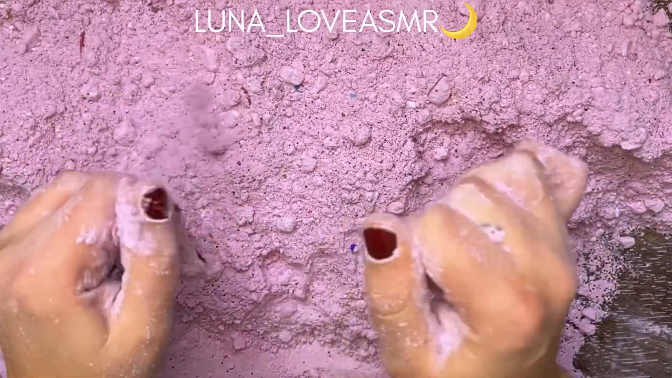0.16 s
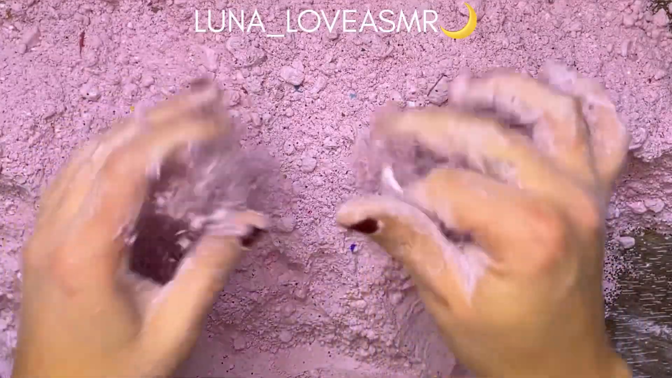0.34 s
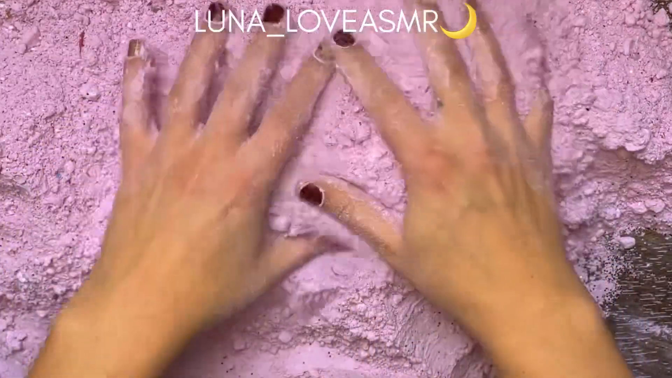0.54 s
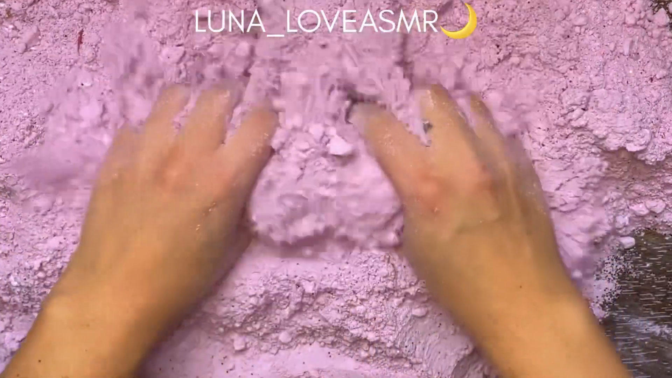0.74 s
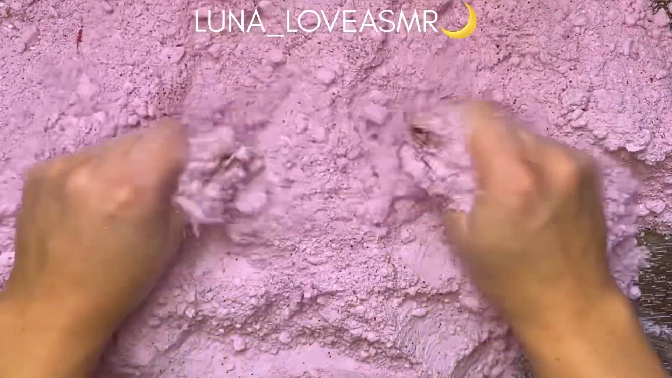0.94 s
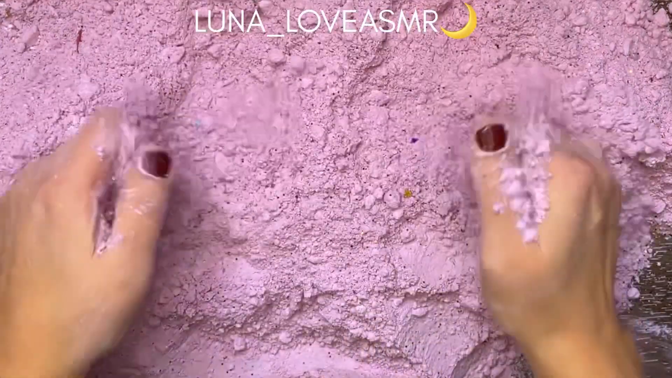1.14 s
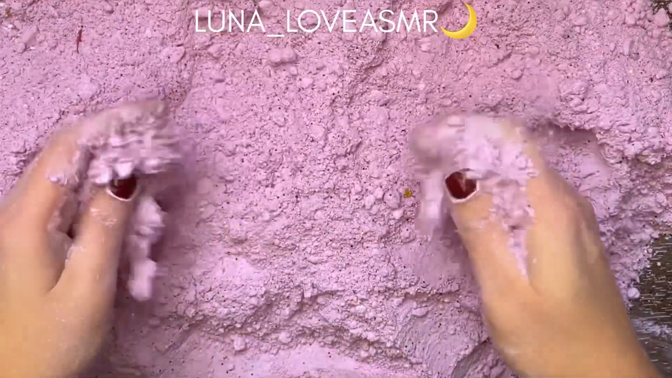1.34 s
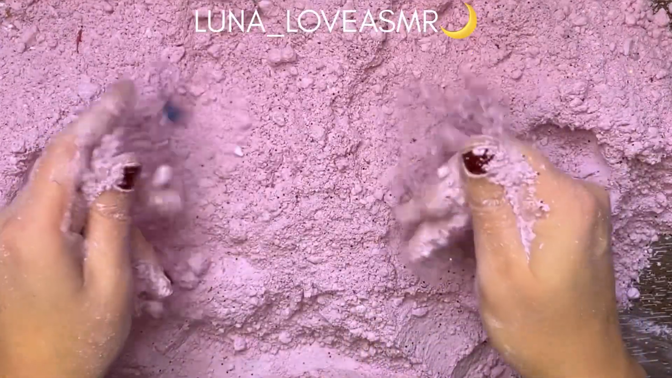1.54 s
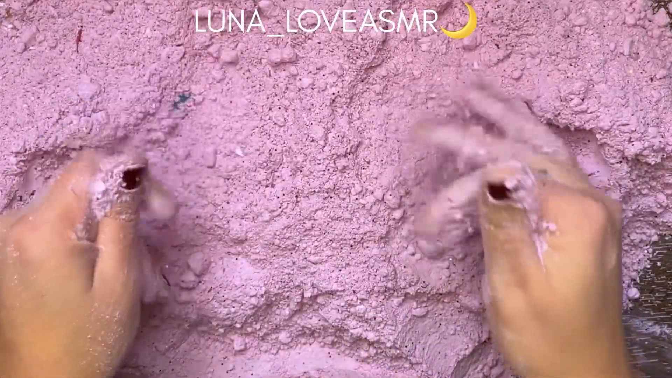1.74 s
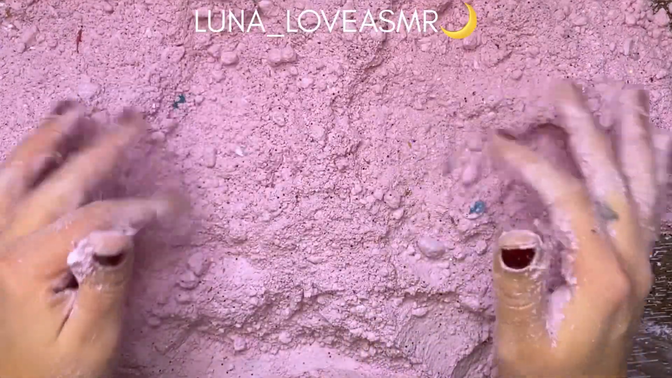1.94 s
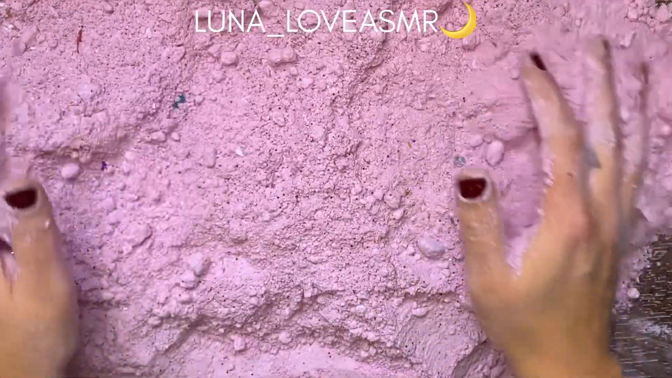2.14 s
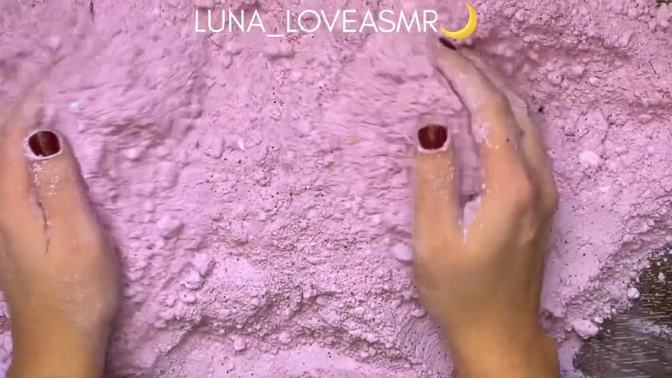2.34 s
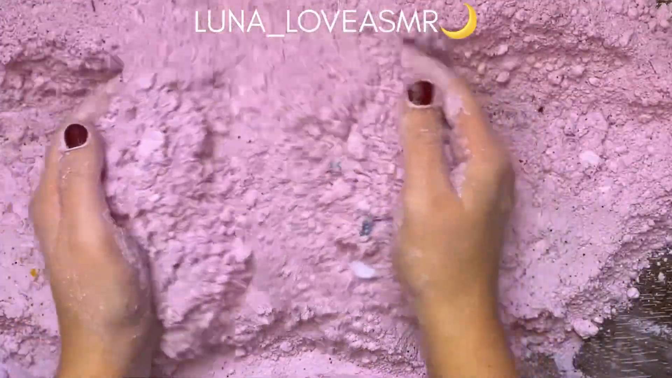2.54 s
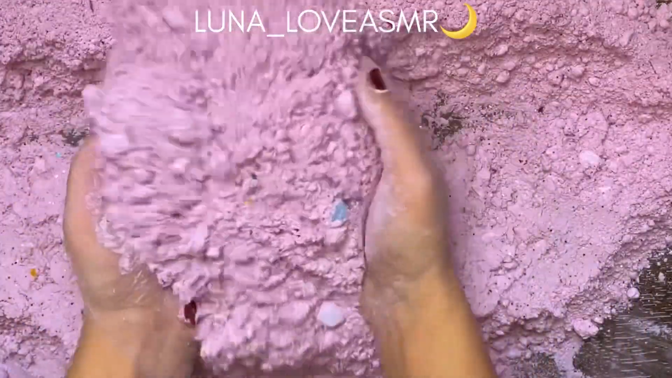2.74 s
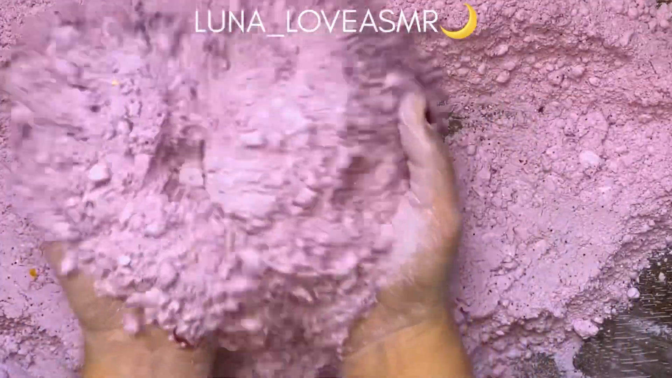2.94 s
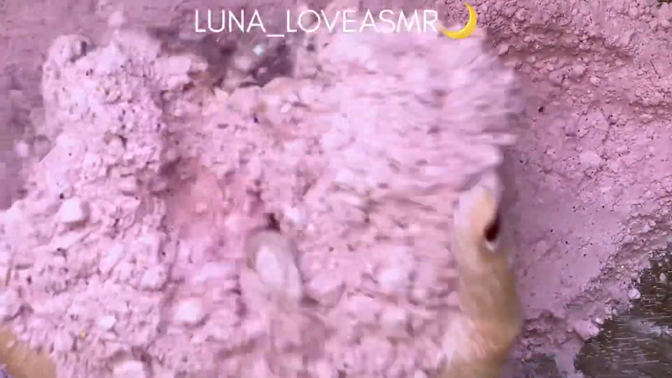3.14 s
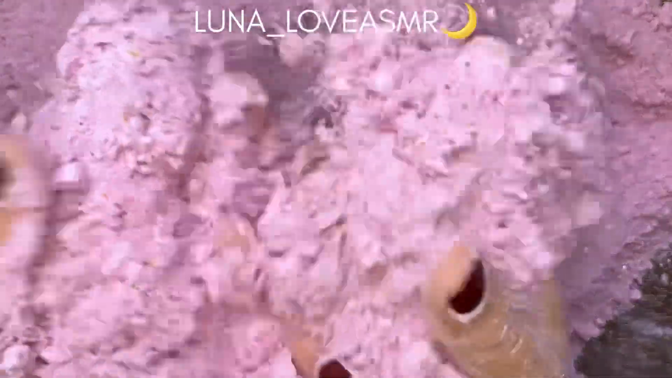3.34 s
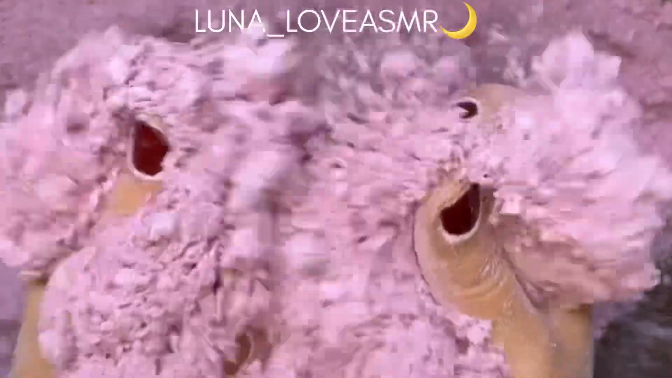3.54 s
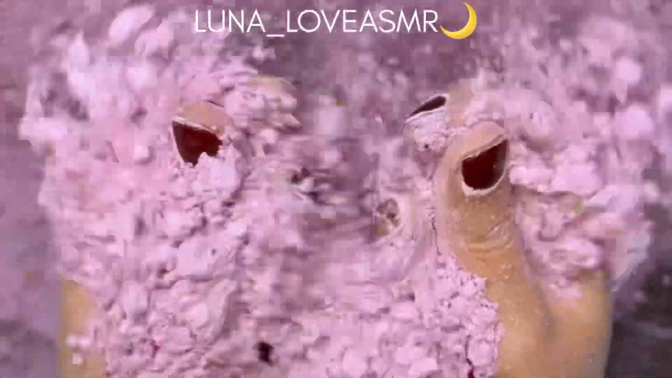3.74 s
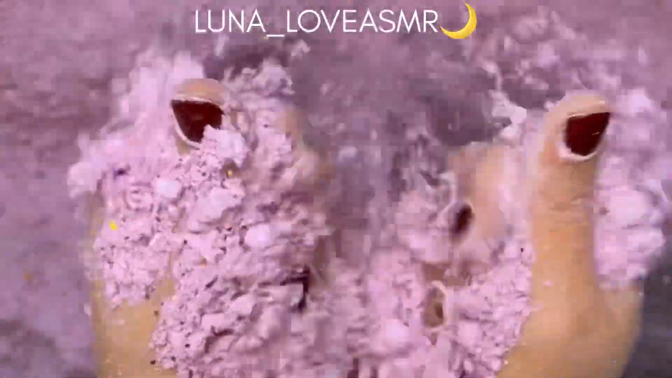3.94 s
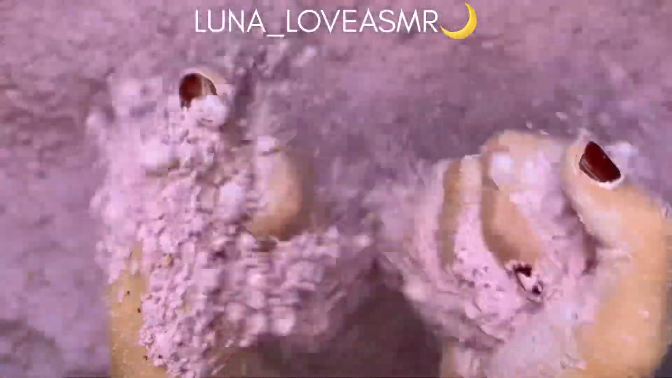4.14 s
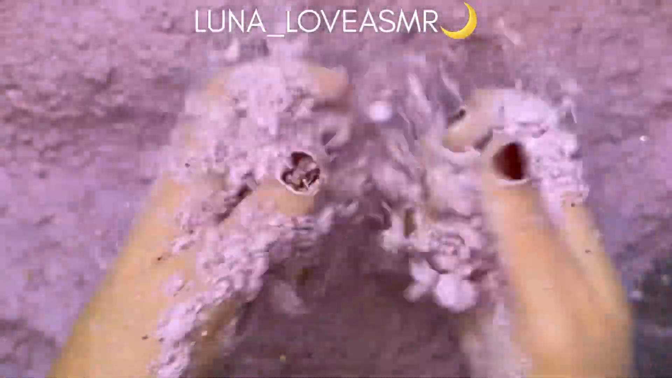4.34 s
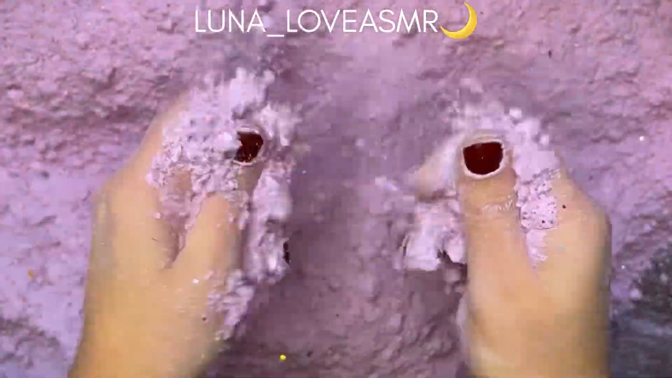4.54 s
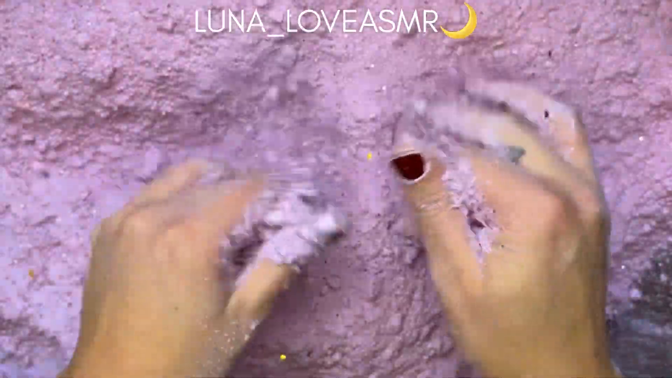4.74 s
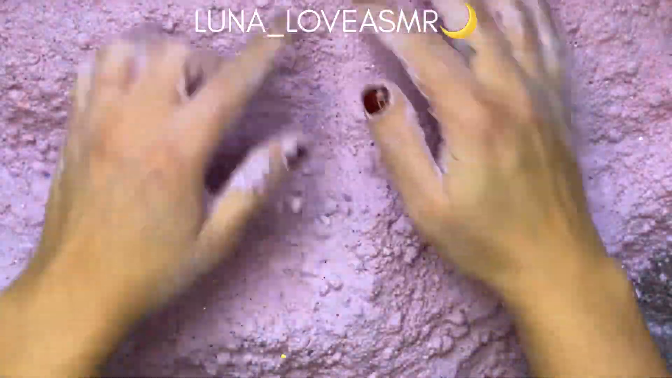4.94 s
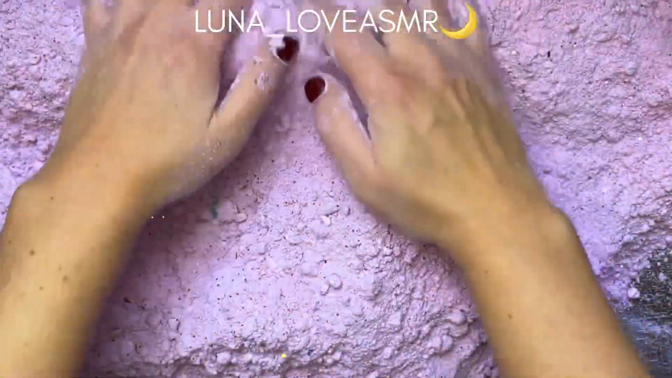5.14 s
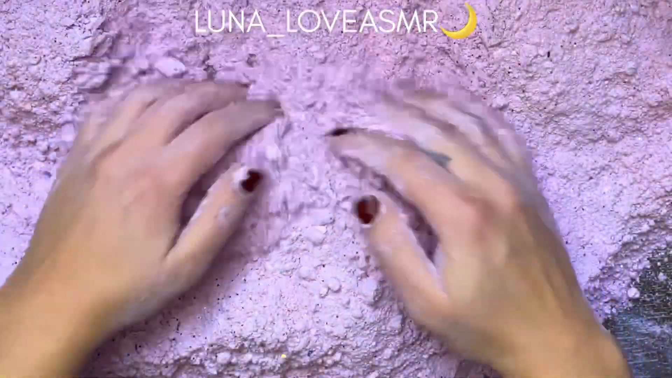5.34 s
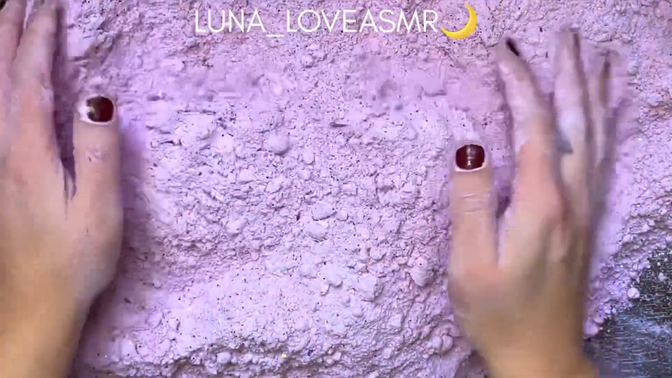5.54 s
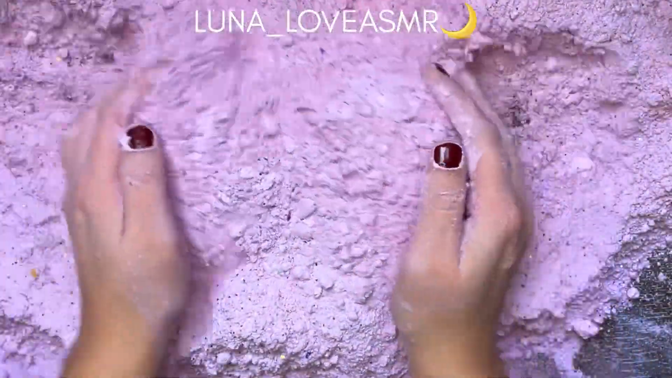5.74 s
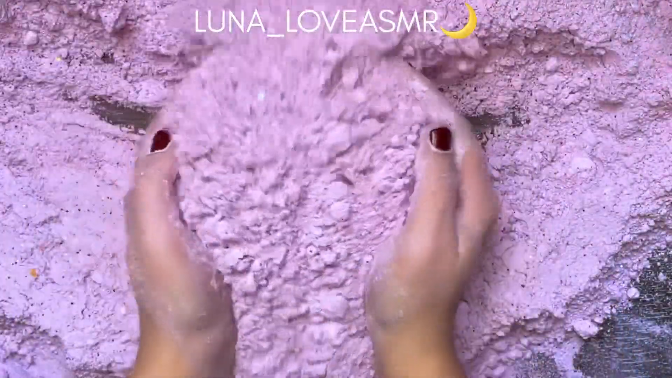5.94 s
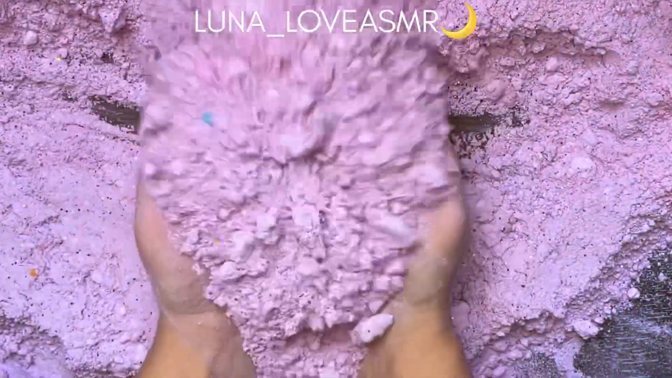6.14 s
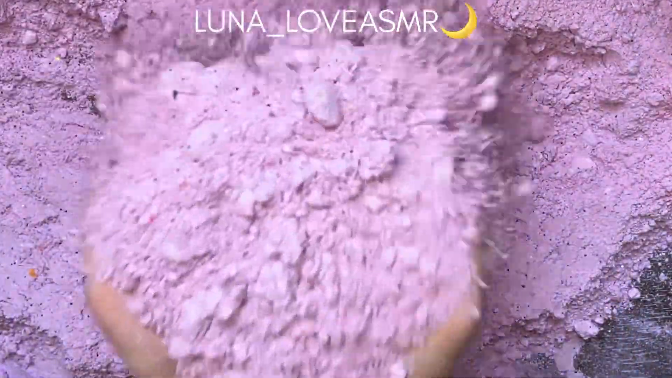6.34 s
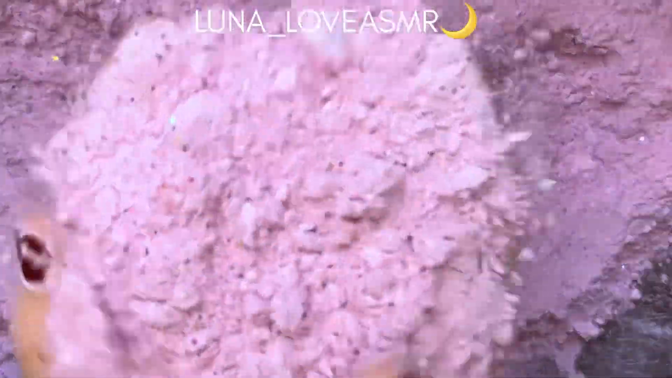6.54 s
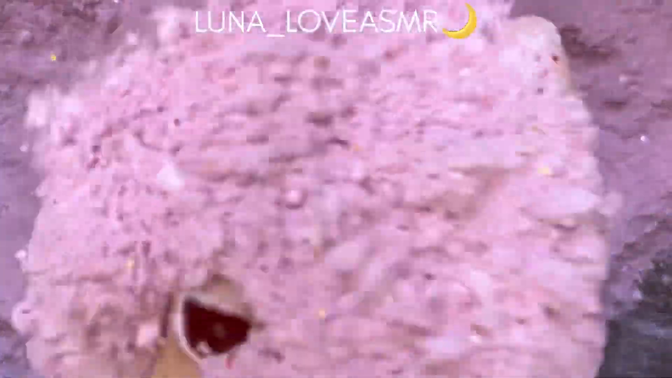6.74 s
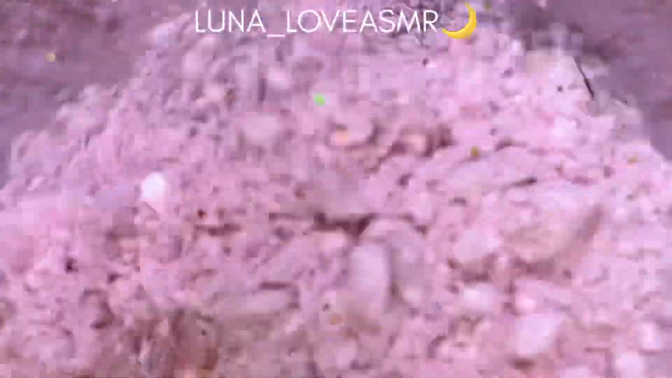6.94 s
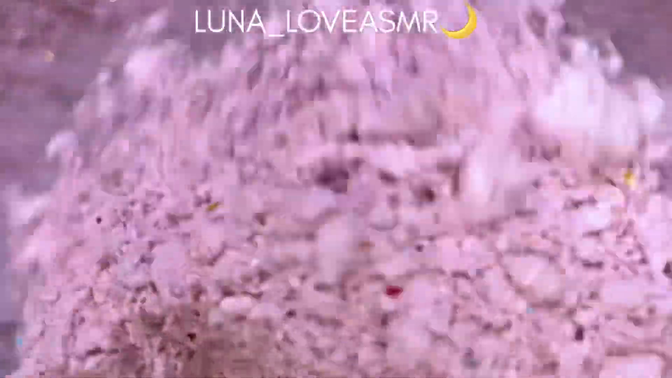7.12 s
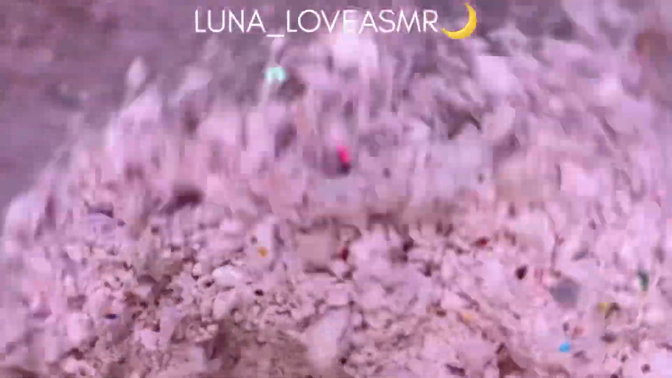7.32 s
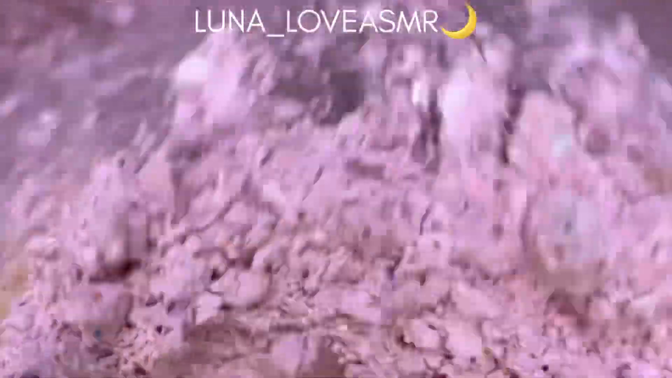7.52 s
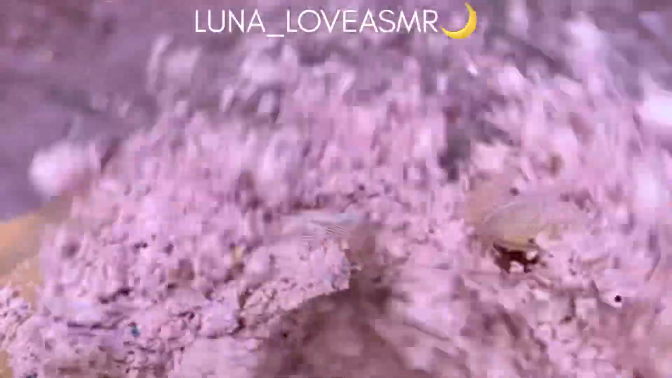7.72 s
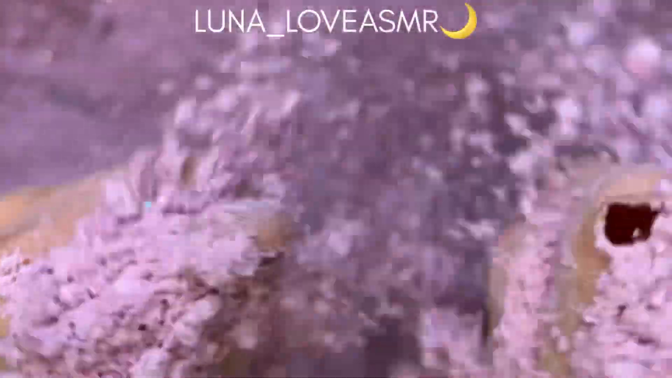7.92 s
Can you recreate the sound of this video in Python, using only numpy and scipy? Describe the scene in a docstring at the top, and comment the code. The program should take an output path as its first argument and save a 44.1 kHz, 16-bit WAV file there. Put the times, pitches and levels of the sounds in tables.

```python
"""Crumbled chalk, scooped, squeezed and dropped on a tray by two hands in a quiet room.
The heap rustles and crunches, lumps clack and crack, hard chips clink, and powder sifts down in a
patter of grains. The tray thuds when the hands bump it; an appliance hums faintly behind.
Heard close up on a phone's two microphones, in wide, slightly hollow stereo."""
import sys
import numpy as np
from scipy import signal
from scipy.fft import rfft, irfft
from scipy.io import wavfile
from scipy.ndimage import uniform_filter1d

SR = 44100
rng = np.random.default_rng(int(sys.argv[2]) if len(sys.argv) > 2 else 0)


def log_audio(samples):
    """Write samples as a 16-bit WAV file to the path given in sys.argv[1]."""
    # one column per channel
    frames = np.atleast_2d(samples).T
    # limit to full scale, then quantise
    limited = np.clip(frames, -1, 1)
    pcm = np.round(limited * 32767).astype(np.int16)
    wavfile.write(sys.argv[1], SR, pcm)


N = 356328


def undb(db):
    """Gain of a level in dB."""
    return 10 ** (np.asarray(db) / 20)


def level(x, db):
    """Scale to an rms level."""
    return x * undb(db) / np.sqrt(np.mean(x ** 2))


def total(db):
    """Level of several unrelated sounds together."""
    return 10 * np.log10(np.sum(undb(db) ** 2, axis=0) + 1e-12)


def gain_curve(table):
    """Gain at each FFT bin from rows of freq_hz, gain_db, joined on a log-frequency axis."""
    freq_hz, gain_db = np.transpose(table)
    bin_hz = np.arange(N // 2 + 1) * SR / N
    return undb(np.interp(np.log(bin_hz + 1), np.log(freq_hz + 1), gain_db))


def colour(x, table):
    """Give a flat noise the spectrum of a table."""
    return irfft(rfft(x) * gain_curve(table), N)


def band(x, low_hz, high_hz):
    """Band-pass."""
    return signal.sosfilt(signal.butter(2, [low_hz, high_hz], "bandpass", fs=SR, output="sos"), x)


def walk(per_s):
    """Random steps, smoothed twice; spread near 1."""
    hold = int(SR / per_s)
    steps = np.repeat(rng.standard_normal(N // hold + 1), hold)
    return 1.3 * uniform_filter1d(uniform_filter1d(steps, hold), hold)[:N]


def uneven_sizes(scatter_db):
    """Random gains: many small pieces, a few large ones."""
    return undb(scatter_db * np.minimum(rng.exponential(size=N), 3))


# Appliance in the background: pitch_hz, level_db, waver_db
HUM_PARTIALS = [(58.5, -45.5, 3.0), (118, -53, 4.5)]
# Hush of the room: freq_hz, gain_db
HUSH_SPECTRUM = [(20, -32), (35, 28), (70, -2), (190, 2), (330, -7), (1900, -45), (5000, 1), (12000, -2),
                 (16000, -41)]

def room():
    """An appliance hums, wavering in level and phase, over the hush of the room."""
    t = np.arange(N) / SR
    hum = 0
    for hz, db, waver_db in HUM_PARTIALS:
        amplitude = np.sqrt(2) * undb(db + waver_db * walk(13))
        hum += amplitude * np.sin(2 * np.pi * hz * t + 0.37 * walk(7.9))
    return hum + level(colour(rng.standard_normal(N), HUSH_SPECTRUM), db=-58.5)


# Hands working the chalk close to the phone; rustle and sifting are relative to crunch, dust to sifting:
# start_s, peak_s, end_s, crunch_db, end_crunch_db, rustle_db, sifting_db, dust_db, crackle_share
HAND_MOVES = [(-.1, 0, 0.019, -42, -49.5, -4, 6, -1.5, 0.3), (.0, 0.066, 0.6, -58, -62, 8.5, 9, -1, 0.5),
              (.06, 0.07, 0.12, -44.5, -55, -3, -5, -6, 0.4),
              (0.385, .395, 0.38, -36, -58, -1, -9, -8, 0.2),
              (0.288, 0.306, 0.32, -42, -49, -5, 13.5, 0, 0.5),
              (0.602, 0.639, 0.7, -31, -33.5, -7, -5.5, -10, 0.3),
              (0.388, 0.783, 0.96, -34.5, -37, 2, -19, -5, 0.3),
              (0.88, 0.983, 1.145, -39, -39, -7, -4.5, -4.5, 0.34),
              (1.19, 1.414, 1.94, -36.5, -48.5, -1.5, -0.5, -11.5, 0.74),
              (1.912, 1.931, 1.97, -46, -55.5, -10, 2.5, 2, 0.94),
              (2, 2.014, 2.05, -38, -45.5, -3.5, -8, -12, 0.2),
              (2.16, 2.224, 2.33, -35.5, -47, 8.5, -19, -10, 0.1),
              (2.118, 2.305, 2.66, -32, -37, -5.5, -3, -15, 0.04),
              (2.37, 2.452, 2.57, -33.5, -43, 4, -24, -14, 0),
              (2.598, 2.708, 2.93, -39, -51.5, 3, -9, -4, 0),
              (2.846, 2.98, 3.28, -40.5, -43, -2.5, -1, -12, 1),
              (3.2, 3.25, 3.2, -50, -45.5, -3, 7.5, -11, 1),
              (3.268, 3.353, 3.65, -29.5, -32, -3.5, -0.5, -30, 1),
              (3.546, 3.74, 4.4, -24.5, -43, 2, 1.5, -24, 0.74),
              (4.08, 4.176, 4.17, -37, -46, -10, 4, -12, 0.8),
              (4.387, 4.434, 4.55, -35, -41, -4, 3, -12, 0.7),
              (4.557, 4.587, 4.76, -35, -43, -2.5, 1, -11, 0.74),
              (4.73, 4.813, 4.91, -40, -42.5, 0, -4, -6, 0.94),
              (4.8, 4.948, 5.3, -59.5, -48, 6.5, 2, 0, 0.5), (5.05, 5.075, 5.11, -50, -52, 10, -4, -10, .2),
              (5.12, 5.15, 5.38, -38, -47.5, 2, -11, -26, 0.3),
              (5.256, 5.288, 5.316, -29.5, -33, -19, 0.5, -23, 0),
              (5.203, 5.416, 5.57, -53, -53.5, 12, -25, -13, 0.16),
              (5.53, 5.545, 5.66, -41.5, -39, 6.5, -9, -8, 0.3),
              (5.577, 5.636, 5.86, -29.5, -37, -2.5, -4, -10, 0.04),
              (5.765, 5.94, 6.12, -29, -44, -1.5, -4, -15, 0.28),
              (6.115, 6.33, 6.76, -45.5, -50, -0.5, 3, -10.5, 1),
              (6.642, 6.718, 6.8, -36, -40, -5, -7, -20, 1),
              (6.725, 6.827, 7.04, -33.5, -41, -4.5, 1, -27, 0.74),
              (6.835, 7.027, 10, -29.5, -30, -3, -2.5, -16, 0.7),
              (7.2, 7.25, 7.33, -33, -40, -3, 3, -21, .9), (7.34, 7.345, 7.45, -28, -39, -2, 4.5, -24, 0.8),
              (7.397, 7.494, 7.9, -33, -35, 4, -5, -20, 1), (7.7, 7.814, 8, -30.5, -32, 4, -0.5, -10, 0.95)]

def hands(swell_db=18.5, release_db_per_s=417):
    """Moves swell, run on and die away; gives five layer levels in dB and the share of crackle."""
    t = np.arange(0, N, 64) / SR
    moves = []
    for start, peak, end, db, end_db, *_ in HAND_MOVES:
        outside_s = np.maximum(start - t, 0) + np.maximum(t - end, 0)
        stroke = np.interp(t, [start, peak, end], [db - swell_db, db, end_db])
        moves.append(stroke - release_db_per_s * outside_s)
    crunch = np.array(moves)
    rustle_db, sifting_db, dust_db, share = np.array(HAND_MOVES).T[-4:, :, None]
    rustle = total(crunch + rustle_db)
    sifting = crunch + sifting_db
    power = undb(crunch) ** 2 + 1e-12
    crackle = np.sum(share * power, axis=0) / np.sum(power, axis=0)
    curves = tray_level(t, rustle), rustle, total(crunch), total(sifting), total(sifting + dust_db)
    levels_db = [np.interp(np.arange(N) / SR, t, curve) for curve in curves]
    return levels_db, np.interp(np.arange(N) / SR, t, crackle)


# Hands bumping the tray: peak_s, level_db
TRAY_THUDS = [(0.521, -37), (.63, -29), (.67, -34), (2.27, -22), (2.36, -26.5), (2.45, -28.5),
              (2.63, -28.5), (2.83, -34), (5.17, -29), (5.631, -25), (5.67, -36), (5.8, -28.5),
              (6.01, -28.5), (7.09, -31), (7.399, -31), (7.54, -31), (7.78, -34), (7.9, -30)]

def tray_level(t, rustle_db, rise_db_per_s=500, fall_db_per_s=218):
    """Level of the tray's low band: it thuds when bumped and murmurs under the rustle."""
    thuds = [db - np.maximum(rise_db_per_s * (s - t), fall_db_per_s * (t - s)) for s, db in TRAY_THUDS]
    murmur_db, rest_db = rustle_db - 9.5, np.full_like(t, -51.5)
    return total(thuds + [murmur_db, rest_db])


def patter(grains_per_s=250, hit_ms=0.75, trail_ms=12):
    """Loudness of falling grains: each starts at once, dies fast and leaves a short trail."""
    falls = (rng.random(N) < grains_per_s / SR) * uneven_sizes(scatter_db=4.5)
    hit, trail = (signal.lfilter([1], [1, -np.exp(-1000 / (ms * SR))], falls)
                  for ms in (hit_ms, trail_ms))
    return level(hit + 0.21 * trail, 0)


# Bands of tray, rustle, crunch, sifting and dust: low_hz, high_hz, grain_share, patchiness_db
HEAP_BANDS = [(58, 162, 0.33, 2.5), (168, 420, 0.4, 1), (600, 2800, 0.9, 1.5), (2500, 6980, 0.7, 1.46),
              (8600, 14000, 0.3, 3)]
# Chalk noise at close range: freq_hz, gain_db
CHALK_SPECTRUM = [(40, -2), (300, -7.5), (1000, -8.5), (2500, -12.5), (5000, -11.5), (8500, -10.5),
                  (9300, -7.5), (12000, -5), (15700, -5)]

def heap(levels_db, crackle, own_share=0.35):
    """Grains sound in every band or in one only, over the smooth rush of fine powder."""
    grains = patter()
    surge_db = 0.5 * walk(6.8)
    out = 0
    for db, (low_hz, high_hz, grain_share, patchiness_db) in zip(levels_db, HEAP_BANDS):
        grainy = grain_share * crackle
        own_grains = np.roll(grains, rng.integers(N))
        grain_power = (1 - own_share) * grains ** 2 + own_share * own_grains ** 2
        noise = rng.standard_normal(N) * np.sqrt(1 - grainy + grainy * grain_power)
        layer = level(band(colour(noise, CHALK_SPECTRUM), low_hz, high_hz), 0)
        out += layer * undb(db + surge_db + patchiness_db * walk(25))
    return out


def knock(hz, ring_turns=0.65):
    """A sharp click sags in pitch into a dull ring of a cycle or two."""
    turns = hz * np.arange(2048) / SR
    phase = turns + 0.8 * (1 - np.exp(-turns / 0.5))
    envelope = 1.11 * np.sqrt(turns / ring_turns) * np.exp(0.5 - turns / ring_turns)
    return np.sin(2 * np.pi * phase) * envelope


# Snapping crumbs, large to small: pitch_hz
CRUMB_PITCHES = [500, 800, 1200, 1900, 3000, 4600]
# Soft clods tumbling in the heap: pitch_hz
CLOD_PITCHES = [219, 333, 482, 704]

def pieces(db, pitches_hz, per_s):
    """Pieces snap or tumble at random while the heap is worked; larger ones ring lower."""
    out = 0
    for hz in pitches_hz:
        snaps = (rng.random(N) < per_s / len(pitches_hz) / SR) * rng.choice([-1, 1], N)
        out += signal.oaconvolve(snaps * uneven_sizes(scatter_db=5.5), knock(hz))[:N]
    return level(out, 0) * undb(db)


def clack(hz, ring_turns, swell):
    """Heard through the phone's microphone, each clack starts above hz and keeps falling in pitch; a soft lump
    swells before it rings."""
    turns = hz * np.arange(2048) / SR
    sag = 0.12
    phase = 1.2 * np.log1p(sag * turns) / sag + 0.5 * (1 - np.exp(-turns / 0.25))
    envelope = (turns / ring_turns / swell) ** swell * np.exp(swell - turns / ring_turns)
    return np.sin(2 * np.pi * phase) * envelope


# Lumps cracking or landing near the microphone; the last three columns trim parts of each sound:
# start_s, level_db, pitch_hz, tick_db, brightness_db, thump_db
LUMPS = [(0.065, -7.5, 1510, -11, -6.5, -21), (0.304, -20, 1890, -4.5, -5, -27),
         (0.393, -22, 1030, -14, -24, -15), (0.42, -40, 2000, -9, 0, -20),
         (0.439, -31, 1030, -19, -12, -12), (0.507, -31, 1060, -6, 4.5, 1),
         (0.63, -21, 1040, -16, -24, -10), (0.667, -20.5, 1030, -8, -9, -22),
         (0.79, -23, 710, -28, -32, -17), (0.901, -20.5, 1000, -20, -27, -0.5),
         (0.937, -32, 3200, -8, -20, -17), (0.975, -19.5, 1010, -7.5, -20.5, -22),
         (1.034, -14.5, 860, -23, -32, -10), (1.043, -12.5, 860, -25, -32, -8),
         (1.3, -34, 977, -5, -19, -15), (1.426, -21, 1090, -3, -25, -18), (1.445, -17, 1070, -16, -26, -13),
         (1.524, -24, 956, 0, -6, -8), (1.55, -29, 2000, -3, 4, -18), (1.581, -19, 1080, -11.5, -19.5, -21),
         (1.595, -23, 1250, 0, -12, -22), (1.605, -29, 2000, -4.5, 1, -20),
         (1.619, -22, 1080, -7, -13, -13), (1.857, -19, 1100, -21, -18, -16.5),
         (1.929, -24, 1640, -17, -5, -31), (2.01, -13.5, 1410, -11, -19, -20.5),
         (2.226, -13, 1564, -7, -31, -16), (2.736, -27, 1500, -5.5, -14, -8.5),
         (2.877, -23, 1480, -7, -32, -30), (2.963, -23.5, 1503, -14, -16, -9),
         (2.969, -32, 1000, -1, -5, -18), (2.99, -32, 1500, -3, -5, -20), (3.004, -26, 2000, -3, -12, -20),
         (3.03, -19.5, 614, -4, -7, -10), (3.038, -28, 1500, 2, -1, -20), (3.047, -29, 1500, -2, -6, -20),
         (3.069, -18.5, 624, -24, -27, -8.5), (3.088, -19, 1620, -27, -25, -23),
         (3.105, -19, 2018, -21, -23, -20), (3.119, -18.5, 616, -18, -20, -22),
         (3.146, -20, 1990, -3, -11, -36), (3.168, -25, 1870, -8, -7, -37), (3.176, -25, 1000, 1, 0, -20),
         (3.18, -25, 890, -10, -2, -20), (3.2, -23.5, 980, -17, -19, -24),
         (3.248, -32.5, 2000, 2, -11, -20), (3.263, -27, 2063, 0, -5, -25),
         (3.287, -15, 2000, -11, -28, -25), (3.296, -12.5, 1950, -38, -42, -25),
         (3.334, -13.5, 1090, -9, -22, -19), (3.338, -32, 2000, -4, -2, -20),
         (3.348, -28, 2000, -4, 3, -20), (3.359, -18, 2160, -0.5, -18, -29),
         (3.377, -23, 2040, -8, -23, -25), (3.396, -17, 760, -3.5, -19, -20),
         (3.406, -4, 950, -31, -19, -19), (3.412, -16, 1190, -5, -22, -23),
         (3.417, -18, 1300, -12, -24, -8), (3.428, -19, 1400, -14, -25, -20),
         (3.435, -17, 1080, -20, -15, -20), (3.477, -25, 958, 9, -16, -17), (3.519, -19, 900, 2, -17, -6),
         (3.521, -21, 1510, 6, -8, -18), (3.541, -17, 587, -0.5, -18, -11),
         (3.607, -11.5, 970, -13.5, -26, -8), (3.616, -14, 600, -11, -25, -5.5),
         (3.656, -7, 1170, -12, -33, -13), (3.668, -16, 3300, -3, -20, -20), (3.684, -14, 900, -5, -20, -7),
         (3.699, -28, 1970, -2, -1, -20), (3.74, -5.5, 660, -1, -34, -25), (3.756, -10, 684, 1.5, -29, -10),
         (3.771, -11.5, 900, -8, -20, -5), (3.795, -12, 1030, -17, -23, -11),
         (3.811, -18, 1500, -5, -18, -18), (3.829, -8, 1200, -10, -29, -16),
         (3.834, -18, 1800, -3, -12, -19), (3.84, -15, 600, -22, -30, 0), (3.847, -12, 1150, -13, -24, -8),
         (3.893, -13.5, 1180, -2, -22, -18.5), (3.908, -19, 1600, -3, -25, -21.5),
         (3.914, -8.5, 1470, -14, -32, -21), (3.949, -9.5, 1180, -5, -9, -30.5),
         (4.008, -7, 1450, -12, -22, -26), (4.027, -11, 1370, -6, -20, -30),
         (4.17, -16.5, 750, -15, -8, -12), (4.215, -24, 2000, 0, -12, -22),
         (4.221, -24, 1110, -8, -20, -18), (4.25, -19, 3300, -9, -18.5, -21.5),
         (4.269, -16, 1170, -4.5, -6, -29), (4.307, -27, 2010, -3, -6, -20),
         (4.331, -24, 3300, -8, -14, -18), (4.35, -19, 593, 3, -1, -23), (4.428, -19, 670, -11, -19, -7),
         (4.441, -26, 1500, -4, -13, -19), (4.461, -15.5, 890, -3.5, -19, -23),
         (4.48, -27, 1500, -3, -14, -21), (4.592, -3.5, 1760, -12.5, -20, -17.5),
         (4.613, -21, 790, -18, -28, -2), (4.626, -23, 1110, -6, -21, -13),
         (4.634, -26, 951.4, -20, -28, -10), (4.694, -14, 1331, -11, -34, -20),
         (4.737, -27, 3500, -6, -13, -22), (4.775, -26, 1100, -18, -24.5, -14),
         (4.805, -23, 1000, -16, -25, -9), (4.821, -25, 1030, -8, -23, -16),
         (4.837, -23.5, 2005, -3, -6, -17), (4.854, -24, 1124, -11, -19, -19),
         (4.922, -39, 1100, -18, -22, -14), (4.933, -40, 2000, -4, -2, -24),
         (4.943, -37, 990, -19, -24, -14), (5.314, -18, 1790, -8, -24, -24),
         (5.647, -15, 1016, -10, -20, -11), (5.934, -18, 1000, -14, -18, -16),
         (5.987, -31, 2000, -4, -2, -20), (6.181, -36.5, 4020, -5, -18, -31),
         (6.214, -32.5, 1500, -11, -22, -20), (6.249, -31, 900, -16, -26, -14),
         (6.308, -22, 1990, -13, -15, -22), (6.325, -19, 1990, -14, -11, -24),
         (6.342, -17, 1980, -23, -30, -34), (6.371, -25, 1610, -14, -19, -11),
         (6.387, -29, 1730, -3, 0, -14), (6.443, -35, 2000, -7, 2, -20), (6.452, -29.5, 910, 0, -1, -23),
         (6.463, -23, 1500, -6, -16, -14), (6.47, -30, 900, -11, -24, -14),
         (6.478, -26, 2000, -4, -16, -20), (6.517, -35.5, 641, 8.5, -17, -24),
         (6.534, -24, 1830, -0.5, -21, -11), (6.567, -38, 1499, 0, -10, -18),
         (6.607, -29, 1709, -6, -24, -19), (6.633, -20, 2070, -11, -29, -18),
         (6.689, -17, 1690, -15, -23, -21.5), (6.721, -15, 1090, -20, -34, -18),
         (6.782, -23.5, 1712, -0.5, -15, -10), (6.806, -3.5, 1680, -24, -40, -19),
         (6.828, -18, 1800, -8, -22, -18), (6.836, -22, 1500, -6, -22, -20),
         (6.849, -24, 2000, -3, -16, -20), (6.87, -18, 2040, -3, -23, -26),
         (6.964, -14, 1800, -15, -27, -24), (6.974, -12.5, 1720, -8, -24, -24),
         (6.979, -8.5, 1700, -20, -23, -27), (6.988, -14, 1400, -10, -24, -16),
         (7.018, -17, 1930, -11, -14, -19), (7.033, -16, 1760, -0.5, -18, -12),
         (7.047, -17.5, 600, -6, -8, -4), (7.059, -20, 1498, 3, -14, -20),
         (7.067, -3.5, 2040, -3.5, -28, -22), (7.069, -9, 770, -30, -40, -12),
         (7.087, -16, 1000, -10, -22, -20), (7.12, -15, 1400, -12, -25, -25),
         (7.127, -6, 1100, -21, -27, -30), (7.145, 0.5, 1020, -32, -40, -26),
         (7.174, -10, 1250, -25, -27, -24), (7.183, -11, 900, -22, -30, -23),
         (7.201, -6.5, 970, -25, -27.5, -12), (7.225, -13, 610, -6, -20, -7),
         (7.254, -15, 696, -1.5, -4, -7), (7.302, -10, 1010, -8, -9, -12), (7.316, -14, 1200, -11, -22, -9),
         (7.343, -23, 686, 4.5, -15, -19), (7.379, -8, 1170, -6, -33, -30.5),
         (7.401, -11, 657, -15, -26, -16), (7.423, -15, 600, -1, -31, -19),
         (7.444, -19, 3500, -4, -18, -20), (7.45, -13, 513, -30, -30, -5), (7.456, -8, 610, -23, -27, -3),
         (7.484, -25, 1060, -14, -29, -7), (7.495, -17, 1600, -18, -28, -20),
         (7.504, -7.5, 888, -11, -18, 1), (7.518, -11.5, 876, 2.5, 1, -28), (7.52, -14, 1990, -3, 4, -28),
         (7.559, -7.5, 1090, -14, -21, -15), (7.568, -12, 1800, -7.5, -20, -20.5),
         (7.575, -19, 501, -20, -30, 0), (7.592, -9, 1010, -20, -28, -5), (7.589, -9, 1030, -0.5, -27, -7),
         (7.618, -11, 1470, 1, -23, -20), (7.633, -10, 1010, -11, -22, -10),
         (7.682, -13, 1050, -12, -22, -10), (7.705, -17, 1158, -12, -25, -17),
         (7.733, -14, 596, -11, -23, -8), (7.749, -6, 1820, -15, -29, -13),
         (7.763, -11, 640, -3, -26, -7.5), (7.77, -13.5, 3500, -5.5, -18, -20),
         (7.802, -10.5, 1580, -1.5, -17, -19), (7.805, -13, 1495, 0, -10, -20),
         (7.812, -4.5, 2160, -3.5, -26, -26), (7.832, -6, 855, -17, -25, -13),
         (7.844, -4.5, 790, -23, -27, -26), (7.864, -1, 990, -15, -24, -13),
         (7.882, -20, 1000, -6, -12, -17), (7.897, -21, 1500, 2, -10, -17), (7.908, -20, 1500, 2, -10, -16),
         (7.933, -15, 1060, -6, -16, -9), (7.957, -18.5, 2000, -4, 7, -20),
         (7.965, -10.5, 989.5, -10, -16, -11), (7.992, -8, 615, -11, -17, -15),
         (8.026, -11, 1246, -21, -20, -4.5), (8.06, -8.5, 1120, -16, -28, -15),
         (8.07, -11, 1100, -14, -26, -12)]

def lumps(delay_ms=0.65, crumble_ms=4, thump_hz=380):
    """Each lump gives a brief crumble, a hollow clack and a soft thump on the heap."""
    out, t = np.zeros(N + 4096), np.arange(2048) / SR
    crumbles = band(rng.standard_normal((len(LUMPS), 2048)), 260, 3900)
    crumbles *= undb(-11.5) * np.exp(-1000 * t / crumble_ms)
    thump = np.sin(2 * np.pi * thump_hz * t) * (t / 0.002) * np.exp(1 - t / 0.0019)
    rings = 0.8 * np.exp(0.25 * rng.uniform(-0.79, 1, len(LUMPS)))  # no two lumps ring alike
    for (start_s, db, hz, tick_db, _, thump_db), crumble, ring in zip(LUMPS, crumbles, rings):
        swell = 0.45 + 0.035 * max(-tick_db, 0)  # the weaker the tick, the slower the swell
        i = int((start_s + delay_ms / 1000) * SR)
        out[i:i + 2048] += undb(db) * (crumble + 0.6 * clack(hz, ring, swell) + undb(thump_db) * thump)
    return out[:N]


def lump_ticks(delay_ms=0.98, tick_ms=0.4, trail_ms=16):
    """The hard edge of each lump: one dry click, frayed by splinters, with a faint trail of dust."""
    out, ms = np.zeros(N + 3072), np.arange(3072) / SR * 1000
    fade = np.exp(-ms / tick_ms) + undb(-15) * np.exp(-ms / trail_ms)
    clicks = 5 * (ms == 0) + rng.standard_normal((len(LUMPS), 2, 3072)) * fade
    bodies, edges = band(clicks[:, 0], 1600, 5800), band(clicks[:, 1], 6500, 15500)
    for (start_s, db, _, tick_db, brightness_db, _), body, edge in zip(LUMPS, bodies, edges):
        tick = 3 * undb(tick_db) * body / np.abs(body).max()
        sparkle = 3.2 * undb(brightness_db) * edge / np.abs(edge).max()
        i = int((start_s + delay_ms / 1000) * SR)
        out[i:i + 3072] += undb(db) * (tick + sparkle)
    return out[:N]


# Hard chips striking each other: start_s, level_db, pitch_hz
CHIP_CLINKS = [(1.314, -33, 2700), (1.355, -34, 5010), (1.368, -30, 4790), (1.427, -27, 3520),
               (1.47, -33, 3300), (1.524, -25, 4830), (1.596, -24, 3660), (1.606, -30, 3700),
               (1.619, -30, 3700), (1.81, -31, 3390), (1.822, -28, 3440), (1.823, -33, 5200),
               (1.83, -33, 3400), (5.203, -24, 1350), (5.267, -30, 1300), (7.519, -12, 4070),
               (7.59, -18, 4120)]

def clinks(ring_ms=1.5):
    """Each chip gives one short ring at a steady pitch."""
    out, ms = np.zeros(N + 1024), np.arange(1024) / SR * 1000
    envelope = np.sqrt(2 * ms / ring_ms) * np.exp(0.5 - ms / ring_ms)
    for start_s, db, hz in CHIP_CLINKS:
        i = int(start_s * SR)
        out[i:i + 1024] += undb(db) * np.sin(2 * np.pi * hz * ms / 1000) * envelope
    return out[:N]


# Stepped phase offset of left ahead of right: freq_hz, offset_rad
PHASE_OFFSET = [(0, 0), (170, -.33), (520, -.5), (1200, -.3), (1750, 0), (2550, 2.0), (3750, 1.0),
                (5000, 1.5), (5700, 3.0), (6200, 3.25), (7700, 6.2), (8600, 6.45), (9800, 9.3),
                (10700, 9.5), (11900, 12.5), (13000, 12.8), (14100, 15.6), (15400, 15.9), (17000, 18)]
# Level of left over right: freq_hz, gain_db
BALANCE = [(30, 0), (120, -1), (300, -2.2), (600, -1.2), (1200, 0), (4300, -1), (8000, 0)]
# Fast random phase flutter between left and right, which widens the sound: freq_hz, depth_db
PHASE_FLUTTER = [(60, -36), (300, -19), (900, -9), (1750, -20), (3500, -10), (5500, -24), (16000, -24)]

def stereo_spread(sound):
    """Left and right part in phase and level band by band, for a wide, hollow, comb-like colour."""
    bin_hz = np.arange(N // 2 + 1) * SR / N
    offset_rad = np.interp(bin_hz, *np.transpose(PHASE_OFFSET))
    left_gain = np.exp(0.5j * offset_rad) * np.sqrt(gain_curve(BALANCE))
    spectra = rfft(sound) * np.array([left_gain, 1 / left_gain])
    # a quarter-turned copy, added left and taken away right, shifts the phase
    turned = irfft(1j * spectra * gain_curve(PHASE_FLUTTER), N) * np.array([[1], [-1]])
    return irfft(spectra, N) + walk(60) * turned


def scene():
    """Chalk, tray and room, heard from a phone close to the hands."""
    levels_db, crackle = hands()
    _, rustle_db, crunch_db, _, _ = levels_db
    chalk = heap(levels_db, crackle)
    chalk += crackle * pieces(crunch_db - 5, CRUMB_PITCHES, per_s=300)
    chalk += pieces(rustle_db - 6, CLOD_PITCHES, per_s=120)
    return stereo_spread(chalk + lumps() + lump_ticks() + clinks() + room())


def record(dry):
    """The phone clips the loudest peaks and cuts the top."""
    top_hz = 15750
    lowpass = signal.ellip(12, 0.2, 60, top_hz, fs=SR, output="sos")
    return signal.sosfilt(lowpass, np.clip(dry, -1, 1))


dry = scene()
out = record(dry)
log_audio(out)
```